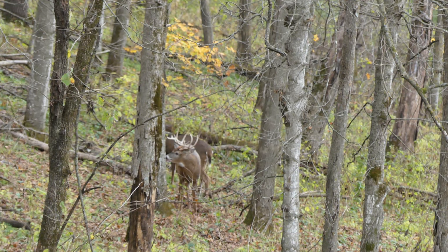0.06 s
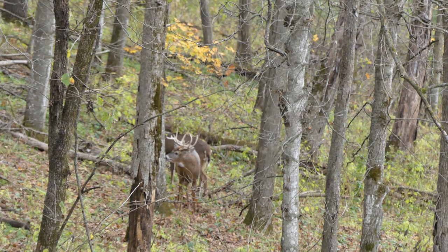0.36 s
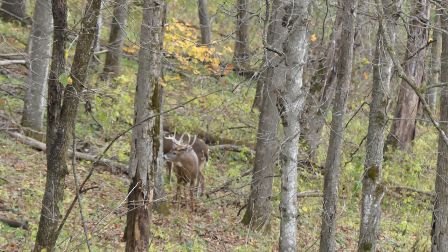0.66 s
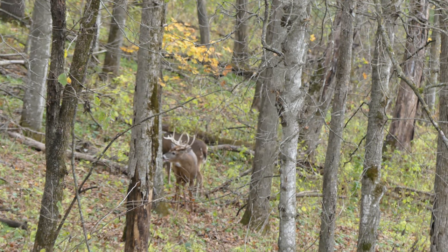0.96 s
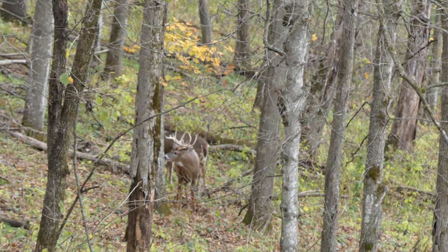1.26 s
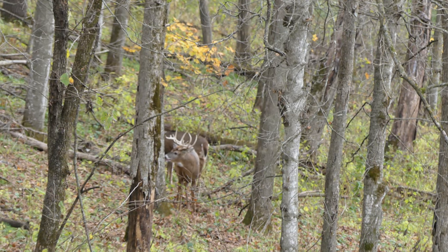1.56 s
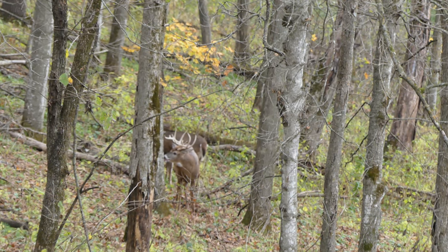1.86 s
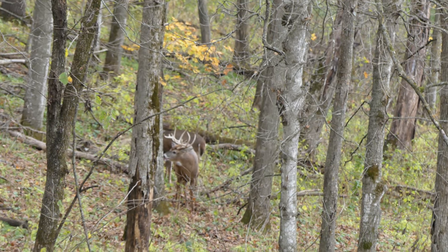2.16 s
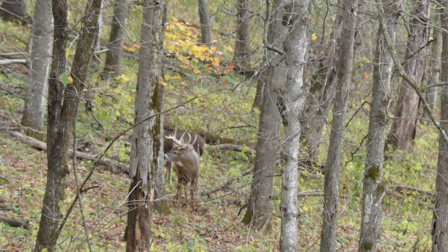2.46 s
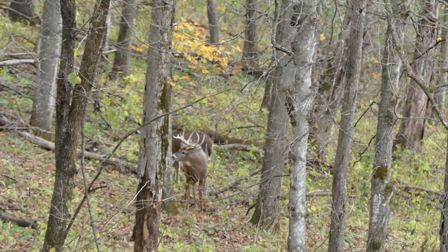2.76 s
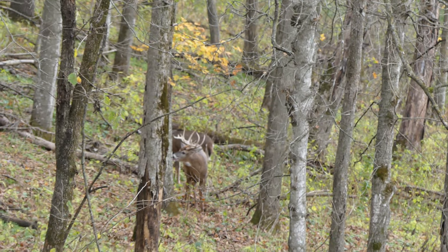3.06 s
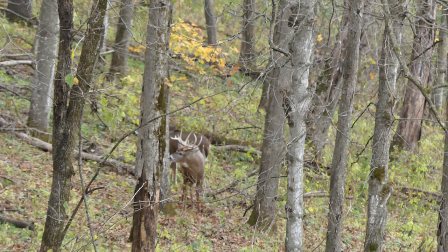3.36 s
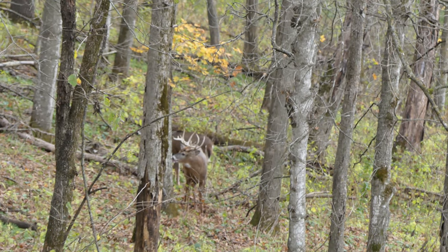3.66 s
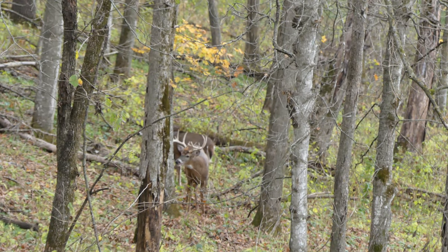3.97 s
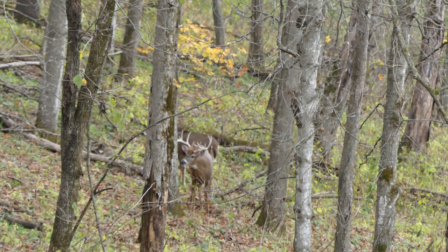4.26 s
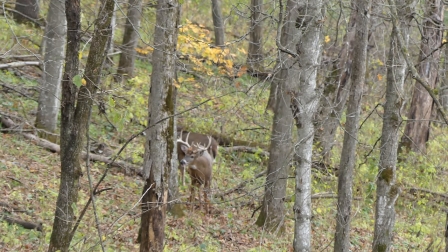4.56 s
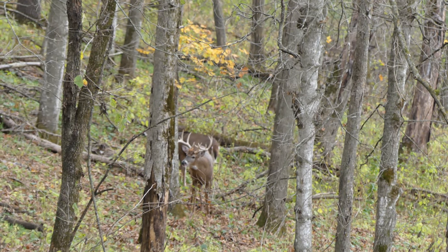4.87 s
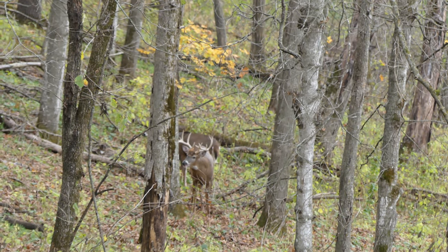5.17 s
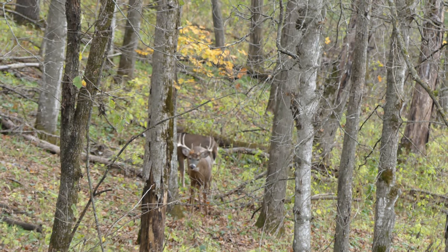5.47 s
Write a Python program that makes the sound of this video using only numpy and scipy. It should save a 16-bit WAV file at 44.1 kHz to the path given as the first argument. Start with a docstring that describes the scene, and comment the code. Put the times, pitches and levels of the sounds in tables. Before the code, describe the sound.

Throughout, two fairly near crickets trill on a high pitch at different speeds, gently swelling and fading over a distant cricket chorus. Beneath them lie the low hush of still woods, a steady microphone hiss and a very faint, wavering far drone. A soft tap and a slight leaf rustle come right at the start. At about 1.2, 1.6 and 1.9 seconds a bird gives three sharp calls, the loudest sounds here. Each is a brief, hoarse yelp that breaks downward into a softer whine, and each echoes among the trunks. Dry leaves stir faintly from about 2.9 to 3.9 seconds. The bird calls twice more, at 4.0 and 4.4 seconds. Between 4.8 and 5.4 seconds several soft, dull taps sound close to the microphone, while the crickets carry on to the end, just short of six seconds.

```python
"""Autumn woodland in still air, on a closely spaced pair of microphones. From the start two tree crickets,
fairly near, trill with their wings near 4 kHz at different speeds, over a far chorus, a faint far drone and
microphone hiss. A second in, a bird among the trees gives three sharp, down-slurred calls, each a yelp and
a whine, and the trunks scatter them. Dry leaves stir in the pause; at four seconds it calls twice more.
Toward the end something taps softly close by."""
import sys
import numpy as np
from scipy import signal
from scipy.fft import rfft, irfft, next_fast_len
from scipy.io import wavfile
from scipy.ndimage import map_coordinates

SR = 44100
rng = np.random.default_rng(int(sys.argv[2]) if len(sys.argv) > 2 else 0)


def persist_wave(psi):
    """Save psi, clipped to +-1, as 16-bit WAV."""
    counts = np.round(np.clip(psi, -1, 1) * 32767).astype(np.int16)
    wavfile.write(sys.argv[1], SR, np.atleast_2d(counts).T)


N = 252693

# The loud yelp that opens each call: start_s, attack_s, scoop_s, break_s (after the start), slide_s,
# note_hz (just before the break), sag_octaves_per_s, level_db, rasp (0-1), open_mouth_hz,
# fundamental_db, bright_db
YELP_NOTES = [(1.190, 0.019, 0.01895, 0.0455, 0.00238, 1457, 9.96, -41.5, 0.41, 1500, 3, 2.5),
              (1.561, 0.0132, 0.00297, 0.0375, 0.0025, 1422, 5, -42, 0.29, 3340, 5.5, 4),
              (1.925, 0.01525, .014, .038, 0.0059, 1480, 11.87, -39, 0.39, 4335, 6.5, 4.5),
              (4.046, 0.01273, .010, .047, 0.0025, 1341, 3, -37.5, 0.29, 5170, -5.5, 0),
              (4.381, 0.0265, .012, 0.04496, 0.0069, 1150, 8, -38, 0.29, 3000, 3.5, 2.5)]
# The softer whine after each yelp: start_s, length_s, first_hz, last_hz, level_db, rasp (0-1),
# mouth_hz, fundamental_db, bright_db
WHINE_NOTES = [(1.244, .066, 1451, 961, -46.5, 0.76, 2364, -4.5, -20),
               (1.607, 0.07194, 1012, 964.4, -45.5, 0.48, 2643, 2, 2),
               (1.975, 0.0756, 987.5, 903.8, -47.5, 0.43, 3214, 4.5, 2.5),
               (4.104, 0.0503, 1328, 1253, -46, 0.47, 3350, -10.5, -12.5),
               (4.44, 0.069, 1260, 1000, -44.5, 0.21, 2235, -8.5, -3)]
# Resonances of the bird's throat: frequency_hz, gain_db
THROAT_RESPONSE = [(700, -11), (1000, 4.5), (1500, -1), (1800, -9), (2200, 11), (2700, 1), (3400, 5),
                   (4200, -3), (5100, -25), (6200, -2.5), (6700, -4), (7300, 3), (8200, -9.5), (9000, -53),
                   (10000, -17.5), (10700, -10), (11600, -51.5)]
# Rushing air in its rasp: frequency_hz, density_db
BREATH_SPECTRUM = [(700, -13.5), (1200, 1.5), (1800, -8.5), (2700, 9), (3400, -10), (4300, 3), (5200, -9.5),
                   (6300, -8.5), (7500, -1.5), (9000, -19), (10700, -11), (12000, -26.5)]
# Rise and fall of each near cricket: time_s, level_db
FAST_CRICKET_LEVELS = [(0, -55), (1.2, -56.5), (1.7, -55.5), (2.3, -52.5), (3.0, -50.5), (3.7, -52.5),
                       (4.3, -62), (5.0, -62), (5.73, -59.5)]
SLOW_CRICKET_LEVELS = [(0, -63), (.4, -55), (1.1, -54), (2.0, -54.5), (3.2, -61.5), (3.9, -53.5),
                       (4.6, -53.5), (5.73, -55)]
# Soft, dull taps close to the microphones: start_s, pitch_hz, peak_db
CLOSE_TAPS = [(.125, 1145, -53), (4.768, 324, -51), (4.879, 1000, -51), (4.892, 298.5, -51.5),
              (5.298, 1204, -51.5), (5.309, 368, -50.5), (5.432, 1114, -49)]
# Stirrings of dry leaves: centre_s, relative_level_db, length_s
LEAF_RUSTLES = [(0.176, -67.5, 0.057), (0.285, -66.5, 0.19), (1.017, -65.5, 0.0377), (2.91, -64.5, 0.093),
                (3.061, -66.5, 0.12), (3.273, -67, 0.166), (3.538, -63, 0.029), (3.581, -60.5, 0.0323),
                (3.831, -65, 0.14), (5.45, -66, 0.039)]
# Their crackle: frequency_hz, density_db
LEAF_SPECTRUM = [(300, 4), (1200, -2.5), (3000, 10), (6500, 4), (10000, -1), (15000, -23)]
# The far cricket chorus: frequency_hz, density_db
CHORUS_SPECTRUM = [(2800, -75.5), (3500, -8.5), (3850, -1.5), (4100, -1.5), (4400, -1), (4800, -10.5),
                   (5800, -25.5)]
# Course of the far drone: time_s, pitch_hz, level_db
DRONE_COURSE = [(0, 152, -72.5), (.8, 152.5, -71.5), (1.4, 161, -69.5), (2.0, 155.6, -96.5),
                (3.0, 162, -76.5), (4.0, 154.6, -73.5), (4.8, 156.3, -67.5), (5.73, 157.3, -70)]
# Still air under the trees: frequency_hz, density_db
AIR_SPECTRUM = [(22, -1.5), (36, 8.5), (60, -10), (90, 1.5), (125, 4), (220, 2), (450, 1.5), (800, -0.5),
                (1400, -2.5), (2300, -9), (4000, -10), (9000, -55)]
# The microphones' own noise: frequency_hz, density_db
HISS_SPECTRUM = [(1000, -11.5), (3000, -9.5), (6000, -4), (9500, -2.5), (12000, -1.5), (15500, 1)]
# Time the wood's echoes take to fall 60 dB: frequency_hz, decay_s
WOOD_DECAY = [(500, 3.45), (1500, 1.505), (2800, 1.745), (5000, 2.28), (8000, 1.06), (14000, 1.045)]


def bird():
    """Five calls, each a yelp and a whine, reaching the microphones through the trees."""
    calls = sum(yelp(*row) for row in YELP_NOTES) + sum(whine(*row) for row in WHINE_NOTES)
    return woods(calls, near_db=-10.5, far_db=-5.0)


def yelp(start_s, attack_s, scoop_s, break_s, slide_s, note_hz, sag, level_db, rasp, open_mouth_hz,
         fundamental_db, bright_db, after_break_s=0.02353, release_s=0.01635, swell_db_per_s=40.5,
         slack_octaves_per_s=5.22, quaver=0.02123, shut_mouth_hz=2082):
    """A hoarse start rises to a high note that sags, breaks down about a fourth and slackens."""
    t = np.arange(int((break_s + after_break_s) * SR)) / SR
    from_break = t - break_s
    before, after = np.minimum(from_break, 0), np.maximum(from_break, 0)
    broken = (1 + np.tanh(from_break / slide_s)) / 2
    note = note_hz * 2 ** (-sag * before - slack_octaves_per_s * after)
    note *= 1 + quaver * drift(143.85, len(t))
    scoop = 1 - .26 * np.exp(-(t / scoop_s) ** 2)
    drop = .26 * (note_hz / 1413) ** 2   # a higher note breaks further down
    pitch = note * scoop * (1 - drop * broken)
    rising = np.minimum(t / attack_s, 1)
    fading = np.maximum(1 - (t[-1] - t) / release_s, 0)
    envelope_db = level_db - 15 * (1 - rising) + swell_db_per_s * before - 16 * fading
    # extra rasp before the note catches and around the break
    rough = rasp + 0.646 * (1 - rising ** 3) + 0.154 * np.exp(-(from_break / 0.00875) ** 2)
    mouth_hz = np.geomspace(open_mouth_hz, shut_mouth_hz, len(t))   # the bill closes
    low_db = fundamental_db * (1 - broken) - 2.5 * broken
    return voice(start_s, pitch, envelope_db, rough, mouth_hz, low_db, bright_db)


def whine(start_s, length_s, first_hz, last_hz, level_db, rasp, mouth_hz, fundamental_db, bright_db,
          edge_s=0.0055, fade_db_per_s=23):
    """A thinner, soft-edged note that droops ever faster as it fades."""
    t = np.arange(int(length_s * SR)) / SR
    pitch = first_hz + (last_hz - first_hz) * (t / length_s) ** 1.8
    edges = np.maximum(1 - np.minimum(t, length_s - t) / edge_s, 0)
    envelope_db = level_db - fade_db_per_s * t - 16.5 * edges
    return voice(start_s, pitch, envelope_db, rasp, mouth_hz, fundamental_db, bright_db)


def voice(start_s, pitch_hz, level_db, rasp, mouth_hz, fundamental_db, bright_db,
          jitter=0.0436, mouth_octaves=0.2274, hoarseness=0.848):
    """Harmonics slide through throat and mouth resonances; rasp shakes the pitch and lets air through."""
    rasp, size = np.clip(rasp, 0, 1), len(pitch_hz)
    phase = phase_of(pitch_hz * (1 + jitter * rasp * drift(910.3, size)))
    harmonics = np.arange(1, 12)[:, None]
    hz = harmonics * pitch_hz
    mouth_db = 10 * np.exp(-(np.log2(hz / mouth_hz) / mouth_octaves) ** 2)
    # the voice dulls as it softens and as the membrane slackens
    soft_db = 0.15 * (level_db - level_db.max())
    slack_db = 17.5 * np.minimum(np.log2(pitch_hz / 1400), 0)
    treble_db = (bright_db + soft_db + slack_db) * np.maximum(np.log2(hz / 3000), 0)
    flutter_db = 12.5 * rasp * np.array([drift(244, size) for _ in harmonics])
    throat_db = at_hz(THROAT_RESPONSE, hz)
    gains = from_db(throat_db + fundamental_db * (harmonics == 1) + mouth_db + treble_db + flutter_db)
    tone = np.sum(gains * np.sin(harmonics * phase), axis=0) / np.sqrt(np.sum(gains ** 2, axis=0) / 2)
    puffs = rng.standard_normal(size) * (1 + np.cos(phase))   # air pulses with each cycle
    note = np.sqrt(1 - rasp ** 2) * tone + hoarseness * rasp * colour(puffs, BREATH_SPECTRUM)
    out = np.zeros(N)
    out[int(start_s * SR) + np.arange(size)] = from_db(level_db) * note
    return out


def near_crickets():
    """A fast and a slow singer, fairly near the microphones."""
    fast = cricket(FAST_CRICKET_LEVELS, strokes_per_s=43.5, top_hz=4248.6, duty=.71, uneven_db=2.0)
    slow = cricket(SLOW_CRICKET_LEVELS, strokes_per_s=32.5, top_hz=4135.6, duty=.54, uneven_db=1.21)
    return woods(fast + slow, near_db=-14, far_db=-9)


def cricket(levels, strokes_per_s, top_hz, duty, uneven_db, fall_hz=1000, skip=.03, octave_db=-23):
    """Each wing closing rings a short tone that sags and fades as the file slows; a few are left out."""
    level_db, = over_time(levels)
    cycles = np.cumsum(strokes_per_s * (1 + 0.028 * drift(30, N))) / SR
    stroke = cycles.astype(int)
    closing = np.minimum(cycles % 1 / duty, 1)
    detune, accent = rng.standard_normal((400, 2))[stroke].T
    played = (rng.random(400) > skip)[stroke]
    phase = phase_of(top_hz + 45 * detune - fall_hz * closing ** 2)
    swell = np.sin(np.pi * closing ** 0.825) ** 2 * played * from_db(level_db + uneven_db * accent)
    return np.sqrt(2) * swell * (np.sin(phase) + from_db(octave_db) * np.sin(2 * phase))


def taps(grit_rad=1.38):
    """Close and dry: each tap swells and dies within a few cycles."""
    t, out = np.arange(SR // 10) / SR, np.zeros(N)
    for start_s, pitch_hz, peak_db in CLOSE_TAPS:
        rise_s = 1.78 / np.sqrt(pitch_hz * 1000)
        envelope = t / rise_s * np.exp(1 - t / rise_s)
        ring = np.sin(2 * np.pi * pitch_hz * t + grit_rad * drift(372, len(t)))
        out[int(start_s * SR) + np.arange(len(t))] += from_db(peak_db) * envelope * ring
    return out


def leaves(grain_db=3.0, gain_db=2.5):
    """Dry leaves stir among the trees in short swells of fine crackle."""
    t = np.arange(N) / SR
    swells = sum(from_db(level_db + gain_db) * np.exp(-((t - centre_s) / (length_s / 2)) ** 2)
                 for centre_s, level_db, length_s in LEAF_RUSTLES)
    grains = rng.standard_normal(N) * from_db(grain_db * drift(400, N))
    return woods(swells * colour(grains, LEAF_SPECTRUM), near_db=-4.5, far_db=-4.5)


def far_crickets(level_db=-60):
    """Many more crickets, all around and too far off to tell apart."""
    return from_db(level_db) * colour(stereo_noise(N, side_db=-14), CHORUS_SPECTRUM)


def far_drone(waver=0.0188, throb_db=2.5):
    """One faint, low tone a long way off, wavering in pitch and level."""
    pitch_hz, level_db = over_time(DRONE_COURSE)
    phase = phase_of(pitch_hz * (1 + waver * drift(12, N)))
    return from_db(level_db + throb_db * drift(11, N)) * np.sin(phase)


def still_air(level_db=-60, waver_db=1.343):
    """The low, slightly uneven hush of the wood."""
    gain = from_db(level_db + waver_db * drift(6, N))
    return gain * colour(stereo_noise(N, side_db=-18), AIR_SPECTRUM)


def microphone_hiss(level_db=-58.5):
    """The pair's own steady, bright noise."""
    return from_db(level_db) * colour(stereo_noise(N, side_db=-9), HISS_SPECTRUM)


def woods(direct, near_db, far_db, near_rise_s=0.0046, near_decay_s=0.028, far_rise_s=0.02):
    """After the direct sound the nearby trunks smear it; the deeper wood answers with a dulling tail."""
    t = np.arange(SR) / SR
    envelope = np.exp(-t / near_decay_s) * (1 - np.exp(-(t / near_rise_s) ** 2))
    trunks = (rng.random(SR) < .08) * envelope   # sparse reflections
    near = unit_rms(stereo_noise(SR, side_db=-44.5) * trunks)
    white, far = stereo_noise(SR, side_db=-22), 0
    edges_hz = np.geomspace(400, 15000, 9)
    for low, high in zip(edges_hz, edges_hz[1:]):
        band = signal.sosfilt(signal.butter(2, [low, high], "band", fs=SR, output="sos"), white)
        far = far + band * from_db(-60 * t / at_hz(WOOD_DECAY, np.sqrt(low * high)))
    spreading = (1 - np.exp(-t / far_rise_s)) / (1 + t / 0.164)   # later echoes have come a longer way
    echoes = (from_db(near_db) * near + from_db(far_db) * unit_rms(far * spreading)) / np.sqrt(SR)
    return direct + signal.fftconvolve(direct[None], echoes, axes=1)[:, :N]


def stereo_noise(size, side_db):
    """White noise that two closely spaced microphones mostly share."""
    mid, side = rng.standard_normal((2, size))
    return mid + from_db(side_db) * side * np.array([[1], [-1]])


def colour(noise, spectrum):
    """Give a noise a smooth spectrum, at unit power."""
    size = next_fast_len(noise.shape[-1])
    gain = from_db(at_hz(spectrum, np.fft.rfftfreq(size, 1 / SR)))
    return unit_rms(irfft(rfft(noise, size) * gain, size)[..., :noise.shape[-1]])


def drift(rate_hz, size):
    """A smooth random wander with a spread near 1."""
    knots = np.arange(size) * rate_hz / SR
    return map_coordinates(rng.standard_normal(int(knots[-1]) + 2), [knots], order=2, mode="nearest")


def over_time(rows):
    """Each column of a timed table, at every sample of the scene."""
    time_s, *columns = np.transpose(rows)
    return [np.interp(np.arange(N) / SR, time_s, column) for column in columns]


def at_hz(points, hz):
    """Read a curve on a log-frequency axis."""
    frequency_hz, value = np.transpose(points)
    return np.interp(np.log(np.maximum(hz, 1)), np.log(frequency_hz), value)


def phase_of(hz):
    """Running phase of a moving pitch, in radians."""
    return 2 * np.pi * np.cumsum(hz) / SR


def from_db(db):
    """Decibels to gain."""
    return 10 ** (np.asarray(db) / 20)


def unit_rms(x):
    """Scale to unit power."""
    return x / np.sqrt(np.mean(x ** 2) + 1e-20)


def scene():
    """The wood from where the microphones stand."""
    voices = bird() + near_crickets() + far_crickets()
    return voices + leaves() + taps() + far_drone() + still_air() + microphone_hiss()


def record(dry, cutoff_hz=15900):
    """The recorder cuts the top steeply."""
    return signal.sosfilt(signal.ellip(12, .1, 70, cutoff_hz, fs=SR, output="sos"), dry)


dry = scene()
out = record(dry)
persist_wave(out)
```